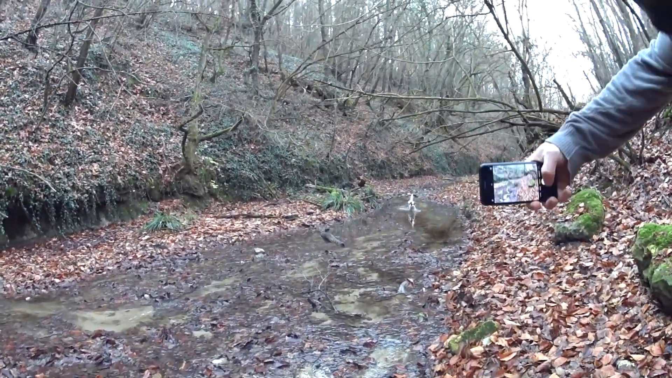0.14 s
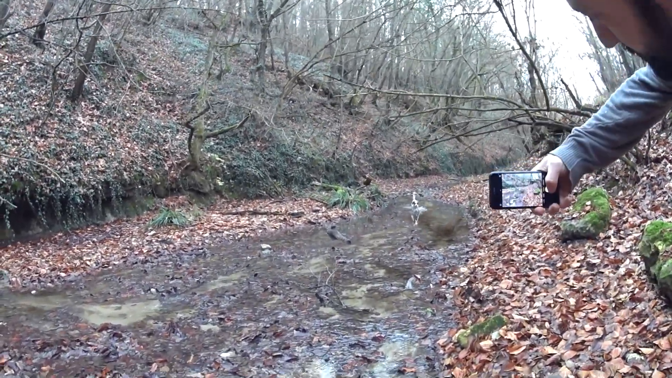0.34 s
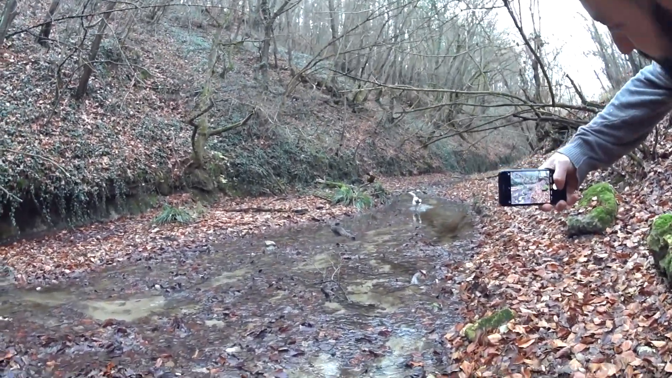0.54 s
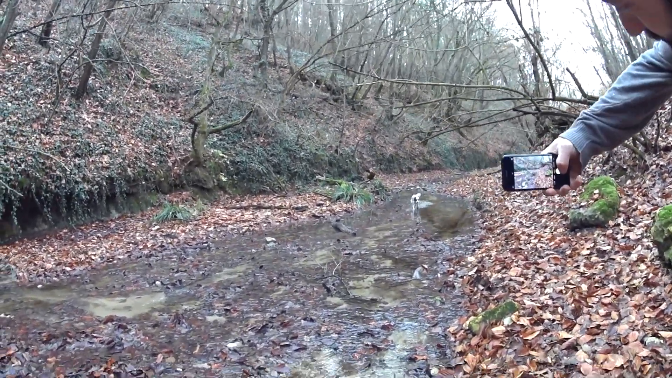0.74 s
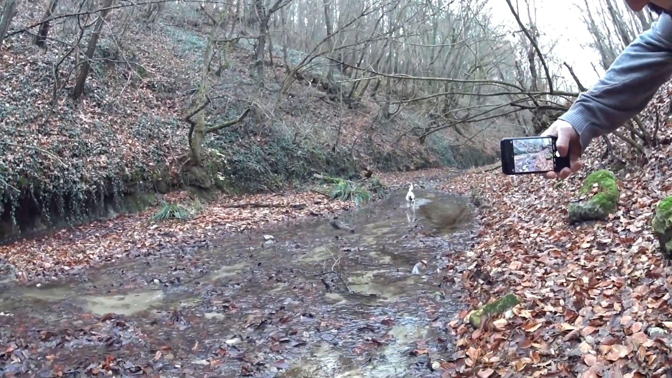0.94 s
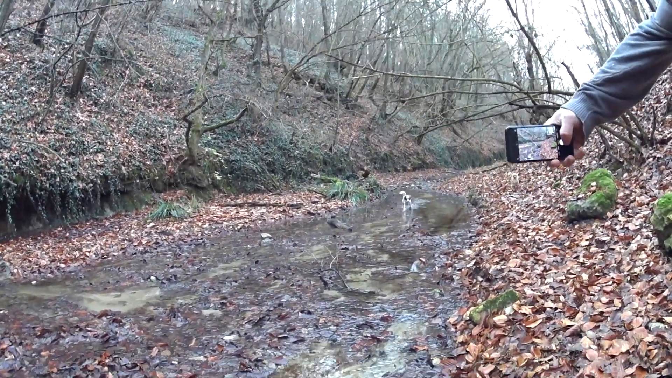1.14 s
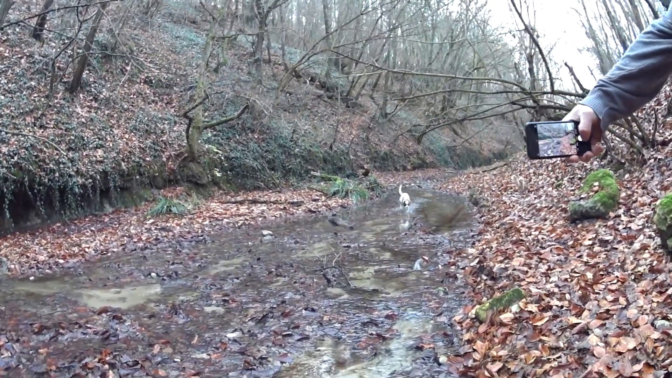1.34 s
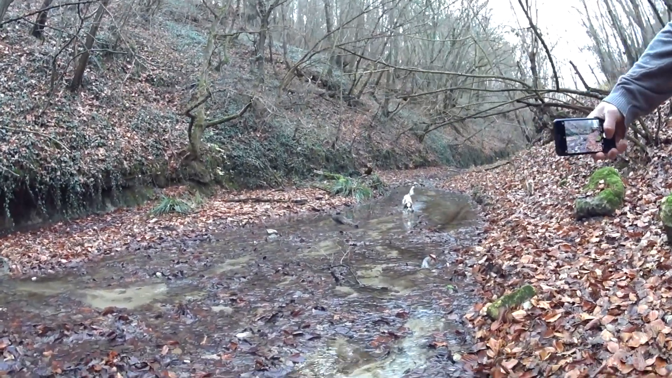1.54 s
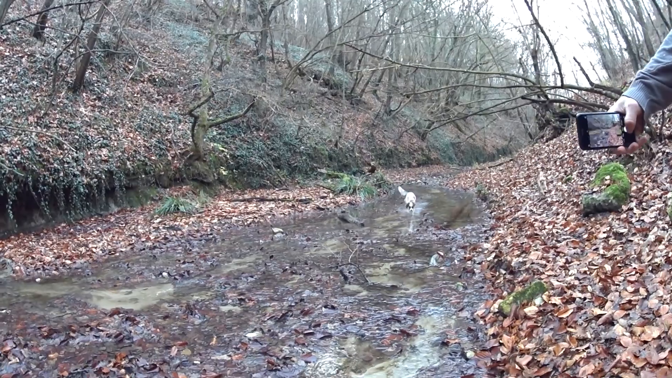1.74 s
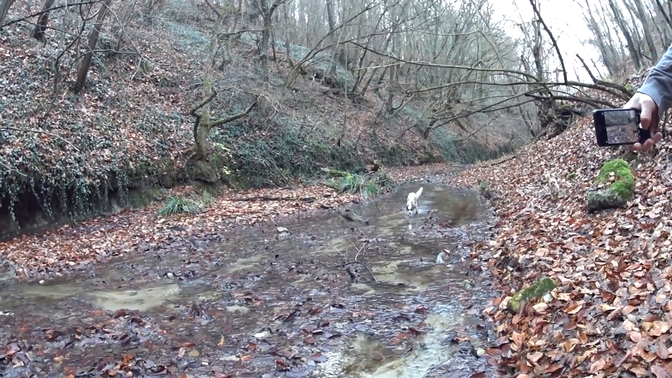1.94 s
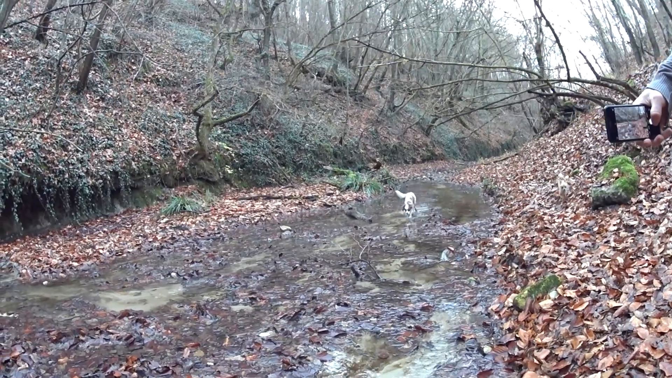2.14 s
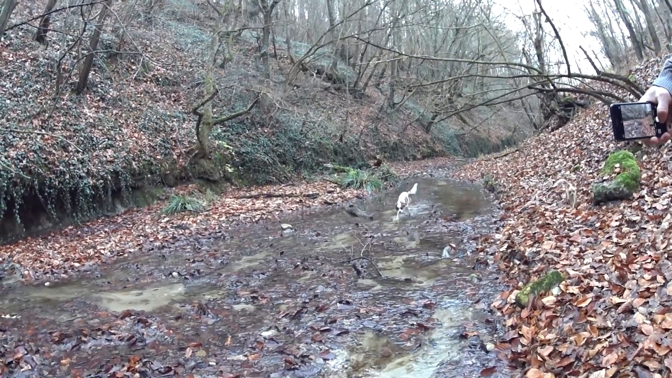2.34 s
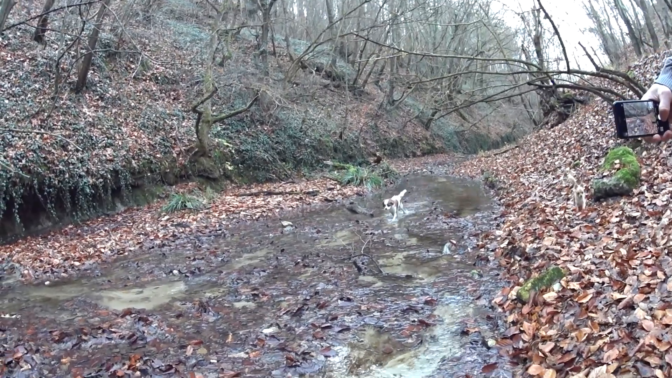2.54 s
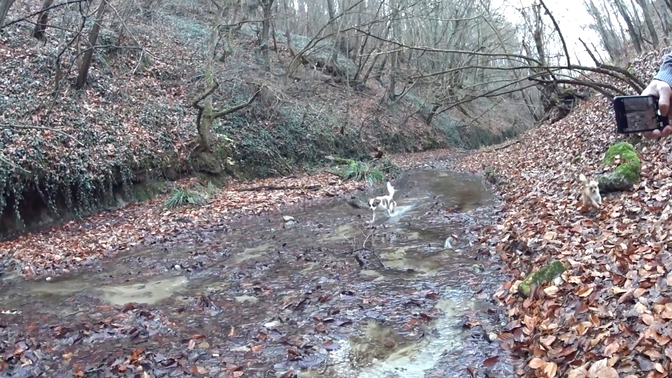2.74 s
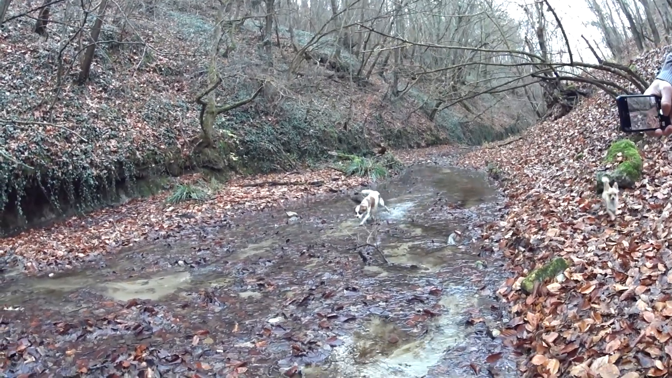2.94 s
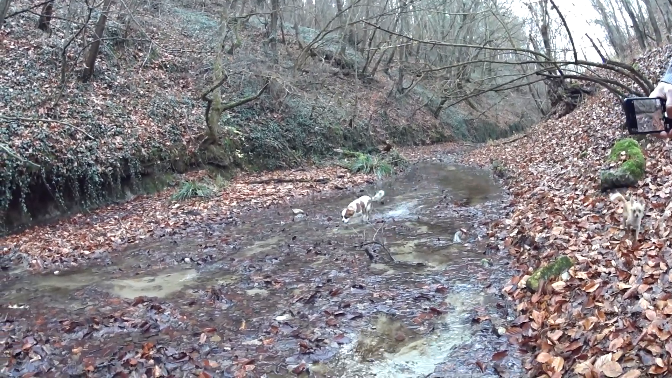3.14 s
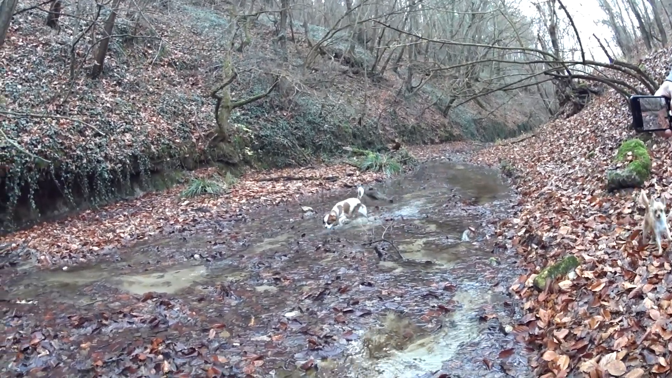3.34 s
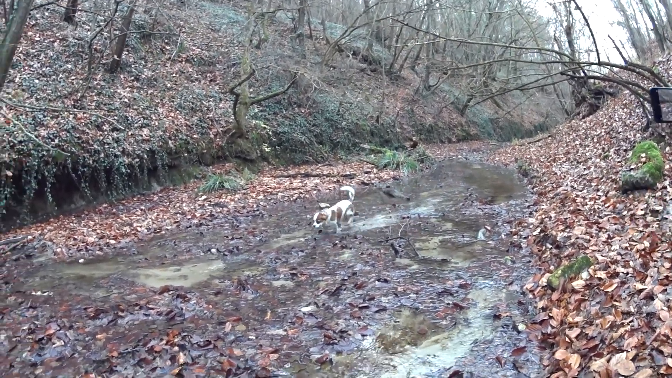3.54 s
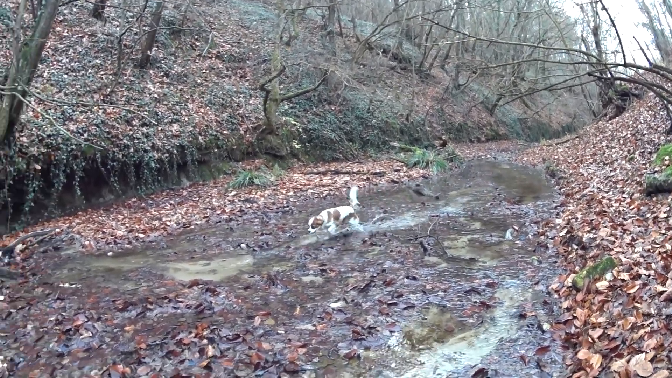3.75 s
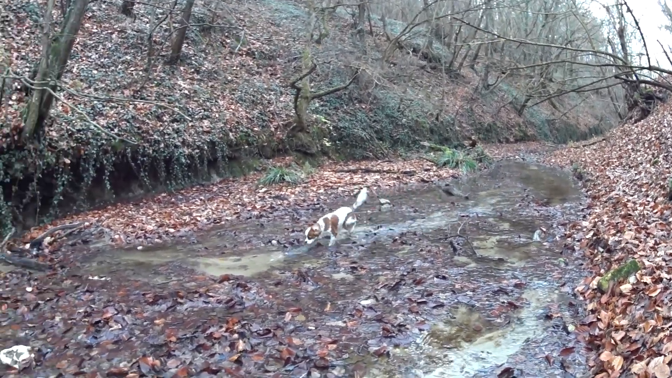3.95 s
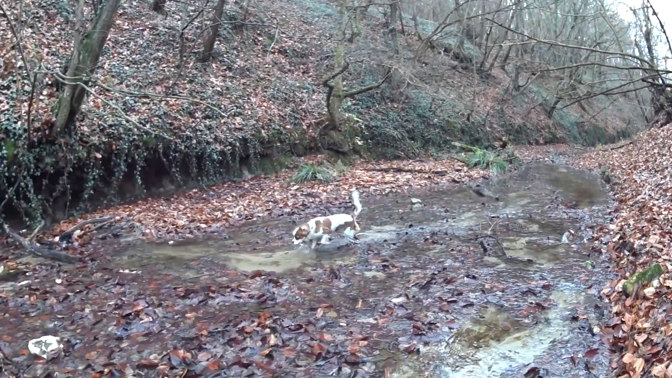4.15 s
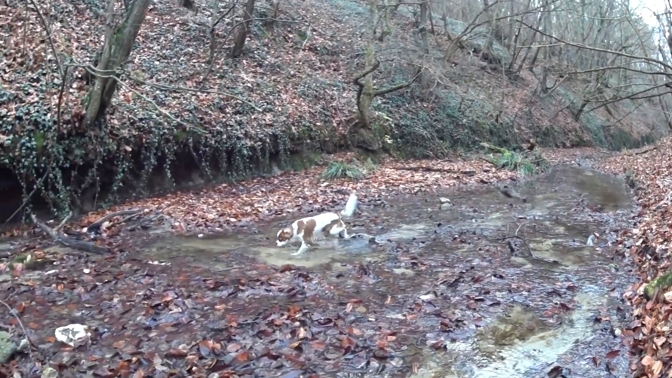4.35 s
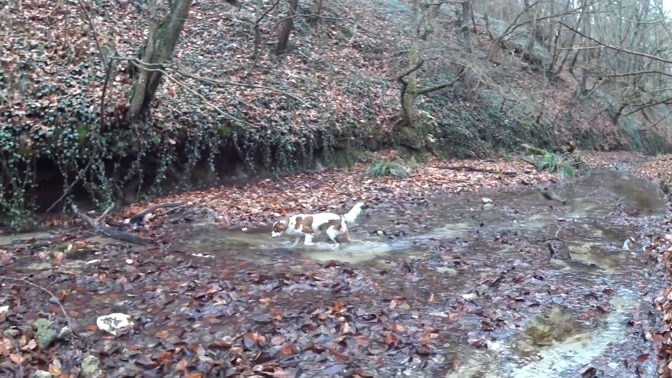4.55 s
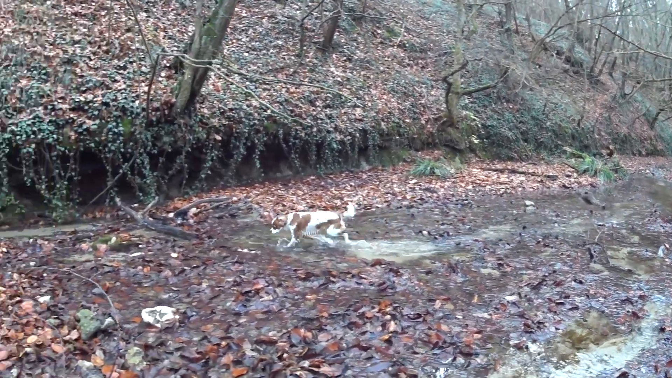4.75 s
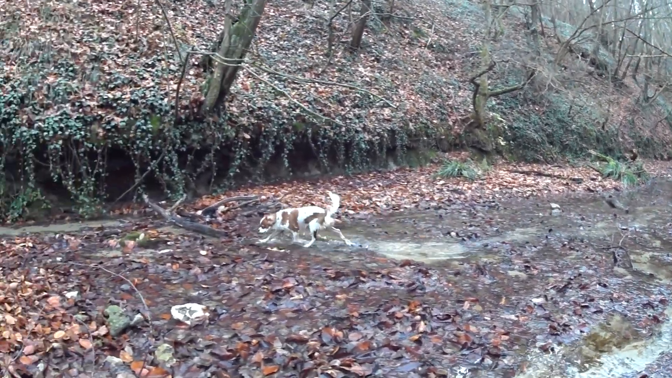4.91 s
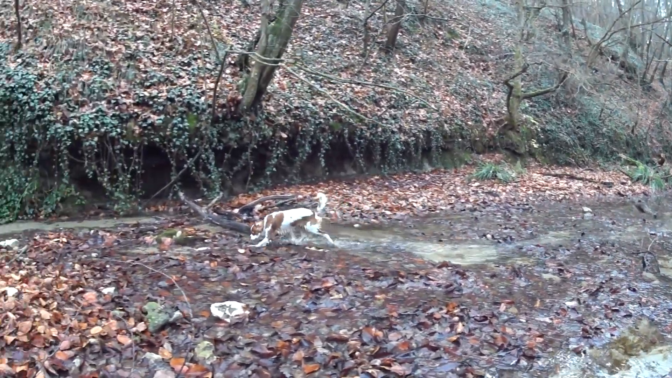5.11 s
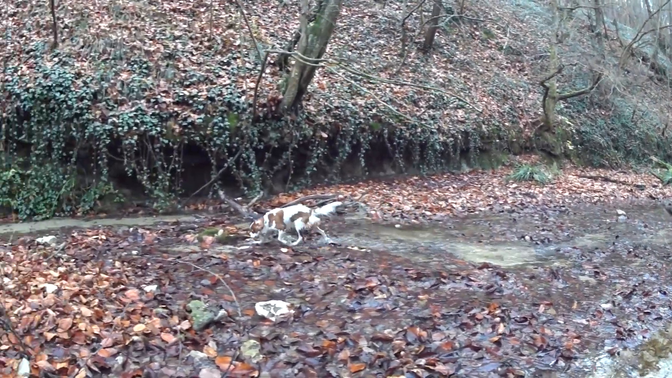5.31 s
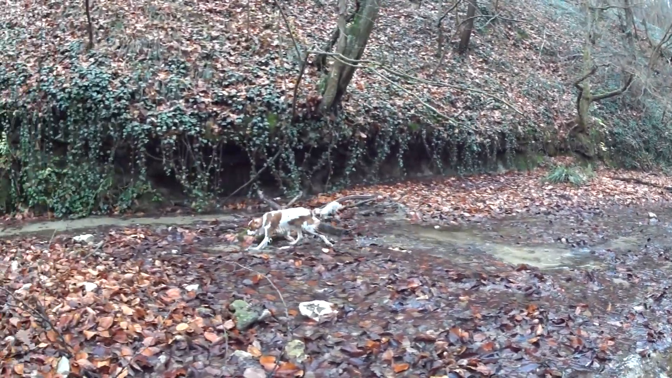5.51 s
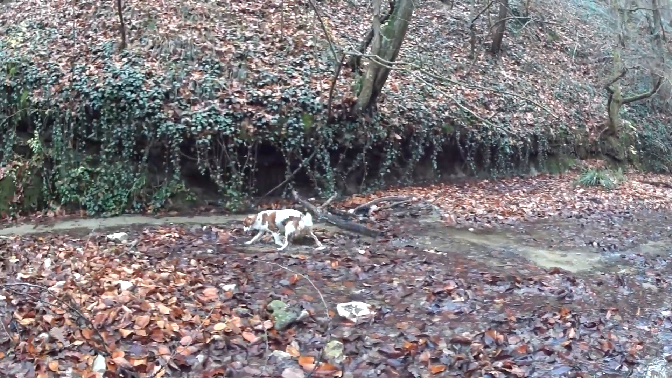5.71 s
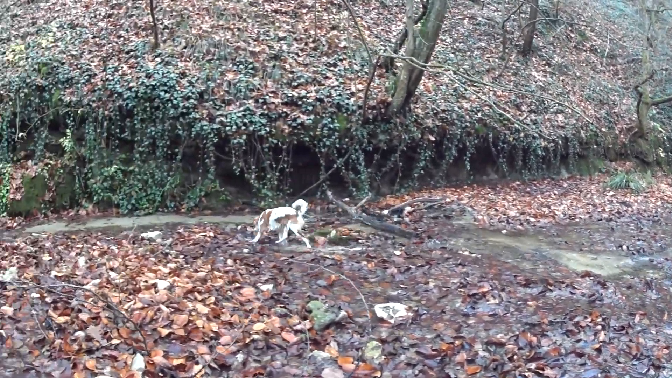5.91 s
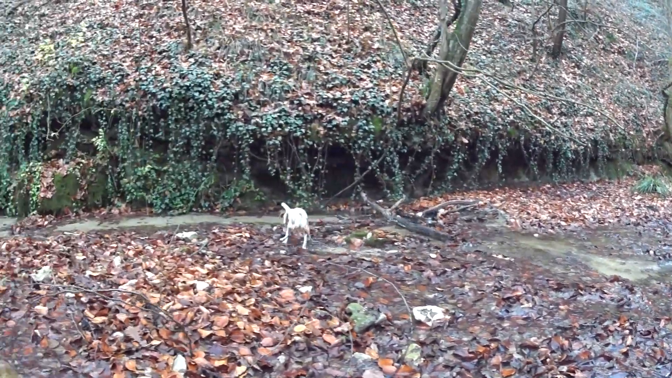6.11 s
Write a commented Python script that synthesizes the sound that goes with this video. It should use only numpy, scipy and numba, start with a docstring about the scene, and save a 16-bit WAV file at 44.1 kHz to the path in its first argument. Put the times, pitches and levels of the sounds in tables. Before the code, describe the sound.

A small dog trots through a shallow stream in a wooded gully. A brief rushing splash opens, followed by light, uneven paw slaps with plops and pattering drops. The splashing grows busier and louder towards the middle, with a short hollow slosh and a few sharp wet clicks, then eases slightly. The brook hisses faintly throughout, and a bird gives one barely audible note. The microphone is a few metres away.

```python
"""Small dog in a shallow stream

A wooded gully, a phone a few metres from a dog trotting upstream. Paws slap the water, the sharpest
with a click; trapped air plops and gurgles, and thrown drops patter back as spray. Drops and
bubbles ring as brief, rising sines. The brook hisses behind, a bird pipes once, the banks echo."""
import sys
import numpy as np
from scipy import signal
from scipy.fft import rfft, irfft, next_fast_len
from scipy.io import wavfile
from scipy.ndimage import uniform_filter1d
from numba import njit

SR = 44100
rng = np.random.default_rng(int(sys.argv[2]) if len(sys.argv) > 2 else 0)


def wav_record(signal):
    """Record a signal, one row per channel, as 16-bit PCM in the file named by sys.argv[1]."""
    frames = np.transpose(np.atleast_2d(signal))
    bounded = np.clip(frames, -1, 1)
    # unit amplitude maps onto the largest positive 16-bit level
    quanta = np.round(bounded * 32767).astype(np.int16)
    wavfile.write(sys.argv[1], SR, quanta)


N = 276639


def undb(db):
    """Decibels to gain."""
    return 10 ** (np.asarray(db) / 20)


def level(x, db):
    """Scale to an rms level."""
    return x * undb(db) / np.sqrt(np.mean(x ** 2))


def colour(x, table):
    """Shape a signal by (Hz, dB) points."""
    hz, db = np.transpose(table)
    size = next_fast_len(N, True)
    bins = np.linspace(1, SR / 2, size // 2 + 1)
    gain = undb(np.interp(np.log(bins), np.log(hz), db))
    return irfft(rfft(x, size) * gain, size)[..., :N]


def walk(rate):
    """Smooth random wander of spread 1, with `rate` new values a second."""
    hold = int(SR / rate)
    steps = np.repeat(rng.standard_normal(N // hold + 1), hold)
    slow = uniform_filter1d(uniform_filter1d(steps, hold), hold)[:N]
    return slow / np.std(slow)


@njit
def ring(start, hz, attack, t60, rise, size, side):
    """Sines that swell, decay and rise. Row 0 is pressure, row 1 its sideways part (left positive)."""
    out = np.zeros((2, N))
    for g in range(len(start)):
        phasor, shut = size[g] + 0j, 1.
        turn = np.exp(2j * np.pi * hz[g] / SR - np.log(1000.) / (t60[g] * SR))
        glide = np.exp(2j * np.pi * hz[g] * np.log(2.) * rise[g] / SR ** 2)
        swell = np.exp(-1 / (attack[g] * SR))
        first = int(start[g] * SR)
        for j in range(max(first, 0), min(first + int(t60[g] * SR), N)):
            pressure = phasor.imag * (1 - shut) ** 2
            out[0, j] += pressure
            out[1, j] += pressure * side[g]
            phasor *= turn
            turn *= glide
            shut *= swell
    return out


def drops(s, hz, cycles, size, side):
    """Small bubbles: each swells for about one cycle and dies by 60 dB over `cycles`."""
    s, hz, cycles, size, side = (np.ravel(c) for c in np.broadcast_arrays(s, hz, cycles, size, side))
    return ring(s, hz, 0.4 / hz, cycles / hz, 0.016 * hz, size, side)


def slaps(spray_gain, count=7):
    """A paw or big drop hits the water: a tight crowd of bubbles, a bright edge, then trailing drops."""
    # Each row: start in seconds, level in dB, centre pitch in Hz, length in ms, edge in relative dB.
    hits = [(0.0463, -27, 3630, 2.6, -28), (0.0794, -36, 3100, 3, -26), (0.1104, -33, 4260, 3.2, -30),
            (0.249, -37.5, 3880, 3, -27), (0.3312, -38, 4900, 4.3, -27), (0.3487, -32.5, 4570, 3.4, -27),
            (0.4683, -48, 3100, 3.7, -16), (0.5743, -41, 4460, 3.6, -23), (0.7142, -41, 3280, 4.6, -29),
            (0.8111, -41, 3580, 3.4, -11), (1.0202, -49, 2600, 2.1, -4), (1.1328, -36, 2230, 3.2, -20),
            (1.1927, -43, 4500, 3.6, -25), (1.3763, -38, 2950, 2.8, -18), (1.4018, -34, 4040, 1.7, -22),
            (1.4154, -35, 3900, 3.1, -30), (1.47, -33.5, 4570, 2.8, -29), (1.5941, -34, 2300, 4.9, -8),
            (1.8135, -42, 3000, 2.9, -4.5), (1.93, -42, 2200, 2.9, -35), (2.0026, -33.5, 7900, 1.9, -27),
            (2.2253, -38.5, 5040, 2.8, -16), (2.4256, -36, 6300, 2.5, -11), (2.437, -38, 8800, 3, -26),
            (2.4494, -34.5, 3970, 2.5, -21), (2.4953, -36, 3630, 3, -22), (2.5782, -37, 2740, 3.3, -16),
            (2.6, -32.5, 4500, 2, -26), (2.6172, -25, 6960, 3.8, -25), (2.6297, -27.5, 3880, 1.7, -32),
            (2.644, -37.5, 2580, 1.9, -30), (2.697, -42, 2190, 4.4, -35), (2.704, -37, 4800, 2, -28),
            (2.7184, -40, 3320, 4.4, -31), (2.7335, -38, 3260, 3.2, -30), (2.7746, -31.5, 2400, 3.8, -30),
            (2.784, -31, 2870, 2, -33), (2.8001, -25.5, 4320, 3.4, -13), (2.8252, -33.5, 2500, 3.3, -25),
            (2.9233, -29.5, 2440, 2.8, -29), (2.997, -40, 2600, 3, -33), (3.0368, -35, 4350, 2.9, -10),
            (3.1467, -38.5, 3150, 2.7, -29), (3.224, -36, 4200, 1.2, -29), (3.241, -30, 2280, 3.8, -36),
            (3.2878, -24, 4100, 2.1, -14), (3.3026, -35, 4260, 3.6, -24), (3.3765, -23, 2840, 1.93, -38),
            (3.5154, -44, 2820, 4.9, -5), (3.5593, -44, 2210, 3, -32), (3.581, -37, 3450, 3.4, -32),
            (3.6326, -34, 4930, 2.2, -36), (3.6745, -26.5, 2340, 4.5, -35), (3.6915, -28, 2350, 2.9, -37),
            (3.7148, -28, 4830, 3.5, -10), (3.7233, -30, 3840, 2.2, -18), (3.8142, -51, 2360, 3, -27),
            (3.9236, -24, 4050, 2.37, -18), (3.94, -31, 6600, 2.6, -40), (3.9588, -24.5, 3220, 2.5, -40),
            (4.0412, -35.5, 3140, 3.2, -37), (4.115, -29.5, 4040, 2.2, -31), (4.1515, -39, 2460, 2.5, -21),
            (4.1684, -32.5, 3800, 2.6, -9.5), (4.1979, -38, 4160, 3, -33), (4.2202, -33.5, 3620, 3.1, -32),
            (4.2577, -31.5, 2220, 3.5, -34), (4.336, -34, 6100, 2.6, -22), (4.366, -43, 5000, 3, -28),
            (4.374, -30.5, 7600, 2.9, -7.5), (4.3854, -31, 3500, 2.4, -30), (4.3959, -28, 2960, 2.9, -35),
            (4.4453, -35.5, 2830, 2.8, -35), (4.4745, -50, 2780, 2.6, -32), (4.505, -47, 2870, 3.7, -23),
            (4.53, -36.5, 4400, 4.7, -23), (4.54, -35, 7290, 6.9, -28), (4.5471, -35.5, 3150, 4.7, -24),
            (4.5617, -39, 3760, 3, -16), (4.5704, -27, 5130, 3.7, -31), (4.581, -19, 4240, 2.25, -38),
            (4.6324, -36, 5360, 3.7, -29), (4.679, -45, 3200, 1.97, -33), (4.7125, -40, 7040, 2.4, -24),
            (4.7411, -35.5, 2220, 2.3, -29), (4.7684, -29.5, 3770, 3.2, -33), (4.778, -27, 4500, 4, -35),
            (4.787, -22, 3900, 2.3, -33), (4.8104, -34, 3030, 3.1, -26), (4.8444, -33.5, 5630, 3.8, -31),
            (4.8702, -33.5, 2220, 2.8, -31), (4.9117, -33.5, 4040, 2.5, -30),
            (4.968, -32.5, 3820, 3.5, -28), (4.9808, -33, 2390, 2.6, -23), (5.0045, -32, 2180, 3.45, -22),
            (5.0617, -34, 2700, 2, -32), (5.1004, -33, 2330, 5.2, -35), (5.1757, -25.5, 8600, 2.3, -18),
            (5.188, -25.5, 3910, 4.4, -34), (5.2095, -24, 3960, 3.3, -34), (5.231, -31, 2980, 3.1, -36),
            (5.321, -35.5, 4560, 2.3, -20), (5.3535, -31, 2860, 1.5, -36), (5.3805, -42, 3020, 3.7, -16),
            (5.3967, -33.5, 2500, 2.6, -9), (5.4102, -24.5, 4480, 2.7, -18.5), (5.462, -35, 4370, 4.1, -20),
            (5.566, -39, 5500, 2.2, -35), (5.5783, -35.5, 7050, 3.7, -5.5), (5.5873, -36, 2720, 1.5, -35),
            (5.594, -48, 7800, 3, -30), (5.6192, -32.5, 3450, 3.3, -18), (5.6885, -46, 4000, 3, -30),
            (5.727, -53, 2300, 3, -35), (5.7407, -37.5, 3060, 3.8, -34), (5.792, -29, 4250, 3.9, -31),
            (5.7985, -36, 3100, 1.34, -24), (5.9002, -36.5, 5700, 3.9, -20), (5.9743, -38, 2750, 2.7, -24),
            (5.993, -34, 2580, 2.5, -18), (6.0487, -45.5, 2250, 3.5, -4.5), (6.114, -37, 2900, 3.3, -32),
            (6.2207, -43, 2840, 4.6, -26), (6.2417, -40, 3000, 3.2, -27)]
    s, db, hz, ms, edge_db = np.vstack([hits, strays(spray_gain)]).T[..., None]
    u = rng.random((len(s), 3, count))
    detune = rng.standard_normal((len(s), count))
    side = -.5 + 0.19 * rng.standard_normal(s.shape)
    follower = np.arange(count) > 0  # the first bubble sounds at once, on the centre pitch
    onset = s + follower * ms / 1000 * u[:, 0]
    pitch = np.clip(hz * 2 ** (0.575 * detune * follower), 1200, 11000)
    size = undb(db + np.where(follower, -5.5, 3))
    crowd = drops(onset, pitch, np.where(follower, 11., 16), size, side)
    edge = drops(onset + 0.0011 * u[:, 2], 7500 * 1.14 ** u[:, 1], 8.5, undb(db + edge_db + 13.5), side)
    delay, height = rng.random((2, len(s), 10))
    wait = 0.042 * delay
    trail_size = undb(db - 6.5 + 9.3 * height - 630 * wait)
    trail = drops(s + ms / 1000 + wait, 2200 * 4.06 ** height, 15.2, trail_size, side)
    return crowd + edge + trail


def strays(spray_gain, count=110, ms=1.5, edge_db=-36):
    """Rows for small slaps at random moments, their level following the spray they fall in."""
    when, weakness, height = rng.random((count, 3)).T
    db = 20 * np.log10(spray_gain[(when * N).astype(int)]) + 12 - 8 * weakness
    hz = 2300 * 2.58 ** height
    return np.transpose([when * N / SR, db, hz, np.full(count, ms), np.full(count, edge_db)])


def stirred(throw_s=0.0041, spray_fall_s=0.039, gurgle_fall_s=0.035):
    """Spray and gurgle gains: a slow base, plus a swell and a fall round every footfall."""
    # Stir between footfalls. Each row: time in seconds, spray level in dB, gurgle level in dB.
    stir = [(0.0, -59, -55), (0.33, -56.5, -60.5), (0.57, -59, -65.5), (1.17, -61, -61.5),
            (1.69, -62.5, -67.5), (2.44, -59, -68), (2.79, -55, -60.5), (3.07, -54.5, -59.5),
            (3.54, -52.5, -60), (3.77, -52.5, -51), (4.26, -55.5, -63), (4.63, -57.5, -63),
            (4.98, -56.5, -59.5), (5.2, -53.5, -58), (5.59, -62, -69.5), (5.85, -61, -73),
            (6.01, -57.5, -61.5), (6.27, -56, -66)]
    # Footfalls that throw water. Each row: time in seconds, spray level in dB, gurgle in relative dB.
    steps = [(0.057, -21.5, -7), (0.249, -38, -3), (0.3496, -36, -20), (0.471, -34, -10.5),
             (0.573, -32, -15), (0.705, -35, -2.5), (0.8111, -46, -18), (1.02, -38, -30), (1.1323, -39, -6),
             (1.196, -30.5, -13.5), (1.402, -27.5, -21), (1.597, -27, -14), (1.815, -30.5, -16),
             (2.005, -36, -7), (2.2253, -44, -16), (2.4264, -44, -2), (2.6123, -22.5, -11.5),
             (2.797, -28, -1), (2.922, -35.5, 3), (3.0355, -40, -24), (3.1467, -56, -2), (3.242, -27, -28),
             (3.2875, -32, -4), (3.3772, -42, -20), (3.5154, -31, -10), (3.6326, -35, -5),
             (3.6915, -32.5, -1), (3.7676, -43, 13.5), (3.8127, -46, -5), (3.924, -22, -28),
             (4.116, -23, -11.5), (4.256, -28, -18), (4.379, -26.5, -33), (4.576, -24.5, -36),
             (4.781, -21.5, -16), (5, -27, -24), (5.1008, -54, -1), (5.178, -27.5, -20), (5.232, -33.5, -5),
             (5.391, -25, -16.5), (5.5787, -35, -19), (5.619, -33.5, -6.5), (5.797, -35.5, -1),
             (5.977, -28, -12), (6.1135, -42, -7), (6.225, -27.5, -8)]
    t = np.arange(N) / SR
    s, *base_db = np.transpose(stir)
    spray_power, gurgle_power = (undb(np.interp(t, s, db)) ** 2 for db in base_db)
    for at, db, gurgle_db in steps:
        i = slice(max(int((at - .1) * SR), 0), int((at + .3) * SR))
        swell = np.minimum(t[i] - at, 0) / throw_s
        after = np.maximum(t[i] - at, 0)
        spray_power[i] += (undb(db - 20) * np.exp(swell - after / spray_fall_s)) ** 2
        gurgle_power[i] += (undb(db + gurgle_db - 14.5) * np.exp(swell - after / gurgle_fall_s)) ** 2
    return np.sqrt(spray_power), np.sqrt(gurgle_power)


def patter(count, mid_hz, octaves, cycles, tilt_db, scatter_db, lean, spread):
    """Drops at random moments, spread round a middle pitch; a few are far louder than the rest."""
    when, chance = rng.random((count, 2)).T
    detune, across = rng.standard_normal((count, 2)).T
    hz = np.clip(mid_hz * 2 ** (octaves * detune), 300, 17000)
    luck = -np.log(1 - .99 * chance)
    size = undb(scatter_db * luck + tilt_db * octaves * detune)
    shower = drops(when * N / SR, hz, cycles, size, lean + spread * across)
    return shower / np.sqrt(np.mean(shower[0] ** 2))


def churn(spray_gain, gurgle_gain):
    """Spray, its fine mist, the wash of fused drops and the gurgle follow how hard the water is stirred."""
    spray = patter(16000, 4165, octaves=.654, cycles=24., tilt_db=.5, scatter_db=2.7, lean=-.79, spread=.77)
    mist = patter(9000, 10000, octaves=.3, cycles=14., tilt_db=-3, scatter_db=2, lean=0, spread=.9)
    wash = patter(40000, 3440, octaves=.936, cycles=7.8, tilt_db=2, scatter_db=2.1, lean=-.89, spread=.97)
    gurgle = patter(4500, 1400, octaves=.5, cycles=13.8, tilt_db=3, scatter_db=2, lean=-.52, spread=.8)
    patchy = undb(2.2 * (walk(45) - .3))
    thrown = undb(-1.5) * spray + undb(-18) * mist + undb(-7) * wash
    return spray_gain * patchy * thrown + gurgle_gain * gurgle


def plops(rise_octaves_per_s=2.1):
    """A closing air pocket rings at its own pitch and rises; smaller pockets beside it roughen it."""
    # Each row: start in seconds, level in dB, pitch in Hz, length in ms.
    pockets = [(0.014, -33.5, 1250, 8.9), (0.037, -33, 1580, 5.7), (0.056, -30, 1880, 4.5),
               (0.068, -31, 1670, 5.4), (0.119, -38, 1020, 5.4), (0.164, -38, 1570, 3.8),
               (0.238, -41, 960, 5.8), (0.251, -41, 1500, 6), (0.35, -39, 1330, 5), (0.37, -41, 1810, 5.9),
               (0.575, -43, 1400, 7.3), (0.825, -34, 1610, 4.8), (1.028, -31.5, 1370, 6.2),
               (1.076, -42, 1740, 8), (1.133, -34.5, 1150, 5.2), (1.145, -40, 1240, 7),
               (1.241, -45, 915, 5.3), (1.416, -43, 1580, 5.9), (1.58, -38, 1660, 5.1),
               (1.595, -36.5, 960, 8.5), (1.613, -37.5, 1390, 6.2), (2.008, -39, 1150, 3.6),
               (2.011, -34.5, 790, 3.82), (2.23, -37.5, 1025, 5.6), (2.427, -37, 995, 5.3),
               (2.581, -41, 1180, 5.2), (2.619, -33, 1010, 5.7), (2.639, -41.5, 1040, 7.3),
               (2.79, -33, 900, 5.9), (2.802, -34, 920, 5.2), (2.819, -32.5, 1610, 5.3),
               (2.865, -39, 925, 6.3), (2.907, -34, 950, 5.4), (2.921, -35, 2010, 4.9),
               (2.947, -34, 1610, 5), (3.122, -39, 925, 5.2), (3.145, -35, 930, 7.5), (3.15, -49, 1650, 11),
               (3.163, -46, 935, 14), (3.242, -34.5, 1390, 4.7), (3.529, -38, 1720, 9.2),
               (3.617, -32.5, 1053, 7.1), (3.673, -34.5, 2140, 7.6), (3.773, -38, 1530, 9.1),
               (3.782, -33, 807, 5.6), (3.805, -28.5, 1070, 4.2), (3.813, -26, 1550, 6.7),
               (3.815, -38, 1180, 5.4), (3.927, -30, 1035, 5.2), (3.958, -38.5, 1990, 6.8),
               (4.115, -35, 1150, 5.7), (4.263, -47, 1240, 14), (4.376, -39, 1180, 6.7),
               (4.396, -32, 1890, 4.8), (4.42, -32.5, 1500, 3.8), (4.428, -42.5, 1130, 9),
               (4.556, -41, 2080, 4), (4.716, -41.5, 1540, 4.8), (4.742, -40.5, 1020, 5),
               (4.787, -37, 1090, 5.6), (4.815, -42, 1290, 7.6), (5.035, -33, 1850, 5),
               (5.098, -34.5, 1480, 5.6), (5.1, -44, 700, 7.9), (5.111, -36, 1310, 7.3),
               (5.178, -34, 1170, 5.9), (5.188, -40, 1080, 5), (5.232, -36, 1410, 3.3),
               (5.239, -31, 1645, 6), (5.395, -51, 1940, 7.9), (5.41, -38.5, 1600, 7.3),
               (5.619, -36.5, 853, 6), (5.63, -47, 842, 8.2), (5.797, -36.5, 1070, 6.8),
               (5.806, -49, 1130, 6.7), (5.993, -55, 1650, 7.7), (6.223, -45, 900, 6.5),
               (6.237, -39, 960, 8.1)]
    s, db, hz, ms = np.transpose(pockets)
    side = -.6 + 0.12 * rng.standard_normal(len(s))
    rise = np.full(len(s), rise_octaves_per_s)
    main = ring(s - .0008, hz, 0.00022 * ms, 0.0027 * ms, rise, undb(db + 7.5), side)
    delay, height = rng.random((2, len(s), 6))
    s, db, hz, ms, side = (c[:, None] for c in (s, db, hz, ms, side))
    beside_hz = hz * 2 ** (1.64 * height - .3)
    beside = drops(s + 1.291 * ms / 1000 * delay, beside_hz, 10.2, undb(db - 10.5), side)
    twins = drops(s + .0004 * ms * delay[:, :2], hz * np.array([.84, 1.28]), 6., undb(db - 3), side)
    return main + beside + twins


def cracks(ring_ms=1.38, side=-.4):
    """A paw breaks the surface: a sharp click in six bands, with one weaker rebound."""
    # Each row: time in seconds, treble level in dB, then middle and top in dB relative to it.
    clicks = [(0.3507, -49, 6, -12), (0.4732, -39, -4, -15), (0.5757, -42, 6, -18), (0.5797, -41, -6, -20),
              (0.813, -38.5, -3, -23), (0.8395, -45, -10, -30), (1.0203, -39, 3, -13),
              (1.0259, -41, -5, -15), (1.1348, -41, 7, -12), (1.1384, -45, 3, -17), (1.343, -47, -2, -1),
              (1.3783, -50, 9, -3), (1.401, -36.5, -4, -17), (1.4168, -43, 4, -21), (1.5923, -37, -5, -30),
              (1.596, -28, 3, -22), (1.6051, -44, 1, -22), (1.8136, -45, -1, -4), (1.9418, -48, 0, -22),
              (2.0049, -51, -10, -17), (2.0221, -45, -9, -20), (2.2304, -43, 0, -12), (2.235, -41, 2, -27),
              (2.4278, -40, -8, -10), (2.4378, -45, -6, -22), (2.4704, -47, -3, -12), (2.5817, -41, -5, -4),
              (2.6205, -31, -3, -12), (2.6322, -37, -2, -22), (2.787, -39, -6, -25), (2.801, -29.5, 3, -24),
              (2.8232, -45, -2, -7), (3.0371, -43, -1, -15), (3.0407, -42, 3, -8), (3.2144, -47, 2, -28),
              (3.2414, -44, 9, -21), (3.248, -36, 3, -17), (3.2906, -25.5, -15, -13), (3.304, -43, 3, -18),
              (3.3793, -32.5, 3, -21), (3.4427, -44, 3, -19), (3.469, -42, 1, -5), (3.518, -39, 0, -14),
              (3.6892, -50, -6, -27), (3.7155, -36, -2, -18), (3.7244, -39, 5, -18), (3.908, -40, -7, -20),
              (3.9253, -32, 7, -25), (3.9334, -46, -1, -21), (3.9407, -40, -1, -24), (4.1102, -45, 4, -31),
              (4.1693, -38, -6, -12), (4.2269, -48, 2, -23), (4.318, -40, -2, -9), (4.3404, -45, 3, -25),
              (4.3776, -31, -8, -23), (4.3872, -35, 0, -26), (4.5059, -44, 2, -24), (4.5379, -45, -8, -22),
              (4.5426, -47, -5, -25), (4.5517, -40, 4, -10), (4.5741, -32, -3, -21), (4.5844, -39, 6, -22),
              (4.5873, -35, 6, -16), (4.634, -45, -2, -23), (4.7126, -43, -15, -27), (4.7227, -37, -6, -25),
              (4.779, -34, 3, -23), (4.79, -29.5, 4, -20), (4.812, -40, -6, -28), (4.8865, -49, 6, -24),
              (4.9178, -43, -5, -19), (4.986, -36, 2, -27), (4.9978, -42, -7, -18), (5.0058, -30, 4, -18),
              (5.0183, -43, -6, -15), (5.1265, -46, -5, -21), (5.1436, -41, 3, -27), (5.1768, -35, -6, -8),
              (5.218, -46, -3, -23), (5.312, -44, -9, -26), (5.3244, -47, 1, -21), (5.397, -41, 5, -6),
              (5.412, -40, 7, -26), (5.5813, -30, -3, -5), (5.6199, -40, 1, -22), (5.6458, -46, -6, 2),
              (5.7925, -52, 7, -32), (5.8, -31.5, -1, -9), (5.948, -41, 3, -21), (5.9655, -40, -10, -12),
              (5.983, -36, -8, -22), (6.0555, -47, 0, -3), (6.1853, -44, 3, -21), (6.253, -42, 3, -18)]
    band_hz = np.array([2800, 4600, 7000, 9300, 12500, 14800])
    band_db = np.array([-10, 6.5, 6.5, -3, 1.5, 3])
    s, db, mid_db, top_db = np.transpose(clicks)[..., None]
    u = rng.random((len(s), 3, len(band_hz)))
    hz = band_hz * (.93 + .14 * u[:, 0])
    tilt_db = band_db + (band_hz < 6000) * np.minimum(mid_db, 3) + (band_hz > 11000) * top_db
    size = undb(db + tilt_db + 4)
    cycles = hz * ring_ms / 1000
    click = drops(s - .0003 + .0003 * u[:, 1], hz, cycles, size, side)
    rebound = drops(s + .0003 + .0015 * u[:, 2], hz, cycles, size * undb(-11), side)
    return click + rebound


def sharp_clicks(cycles=2.5, side=-.3):
    """Twigs snap: a very short, broad click with a faint rebound."""
    # Each row: start in seconds, level in dB.
    snaps = [(5.005, -32), (5.41, -28), (5.581, -34), (5.7987, -19.5)]
    s, db = np.transpose(snaps)[..., None]
    hz = np.array([3500, 7000, 13000])
    size = -undb(db + np.array([9, 8, 5]))
    return drops(s, hz, cycles, size, side) + drops(s + .0009, hz, cycles, size * undb(-8), side)


def surge():
    """A heavy splash dies away at the start: so many drops at once that they fuse into a rush."""
    # Each row: time in seconds, level in dB.
    envelope = [(0.0, -42.5), (0.028, -40), (0.06, -41), (0.13, -41), (0.16, -54), (0.2, -53)]
    # Each row: frequency in Hz, relative noise density in dB.
    spectrum = [(88, -63), (150, -10), (430, -9), (564, -2.5), (1140, -2.5), (1850, -4.5), (2080, -2),
                (10100, -16.5), (15800, -28)]
    s, db = np.transpose(envelope)
    t = np.arange(N) / SR
    pressure, sideways = level(colour(rng.standard_normal((2, N)), spectrum), -1)
    gain = undb(np.interp(t, s, db) + 1.25 * walk(139))
    fade = np.clip((s[-1] - t) / 0.12, 0, 1)
    return gain * fade * np.array([pressure, 0.44 * sideways - 0.6 * pressure])


def tone(table, side):
    """A sine along (seconds, Hz, dB) points, faded at both ends."""
    s, hz, db = np.transpose(table)
    t = np.arange(N) / SR
    fade = np.clip(np.minimum(t - s[0], s[-1] - t) / 0.0013, 0, 1)
    wave = np.sin(2 * np.pi * np.cumsum(np.interp(t, s, hz)) / SR)
    return np.sqrt(2) * fade * undb(np.interp(t, s, db)) * wave * np.array([[1], [side]])


def glug():
    """One deep cavity fills slowly, so its rough tone climbs."""
    # Each row: time in seconds, pitch in Hz, level in dB.
    cavity = [(3.149, 721, -59), (3.153, 718, -38), (3.16, 700, -41), (3.165, 672, -51), (3.18, 760, -54),
              (3.191, 946, -45), (3.205, 1100, -57), (3.215, 1500, -55)]
    return undb(2 * walk(180)) * tone(cavity, side=-0.41)


def slosh(count=45):
    """Water slops in a hollow round the legs: large bubbles near its pitch blur into a hoarse tone."""
    # Each row: time in seconds, pitch of the hollow in Hz, level in dB.
    hollow = [(3.601, 650, -50), (3.64, 620, -47.5), (3.69, 490, -47), (3.72, 470, -55),
              (3.745, 520, -49.5), (3.79, 475, -60), (3.825, 472, -44), (3.86, 493, -58), (3.9, 500, -58),
              (3.96, 544, -56), (4.019, 553, -68)]
    s, hz, db = np.transpose(hollow)
    jitter, detune = rng.random((count, 2)).T
    when = s[0] + (s[-1] - s[0]) * (np.arange(count) + jitter) / count
    pitch = np.interp(when, s, hz) * (.95 + .04 * detune)
    return drops(when, pitch, cycles=25., size=undb(np.interp(when, s, db) + .7), side=-0.63)


def thud(at_s=3.688, hz=185, length_s=.026):
    """A paw meets the stream bed: a dull knock of a few cycles."""
    onsets = at_s + length_s * np.array([0, .3, .6])
    return drops(onsets, hz * np.array([1, 1.6, 2.3]), cycles=6.2, size=undb(-49), side=-.3)


def bird():
    """One faint, falling note off to the right, wavering in level."""
    # Each row: time in seconds, pitch in Hz, level in dB.
    note = [(2.105, 2100, -71), (2.115, 1980, -59), (2.143, 1894, -58), (2.175, 1880, -57),
            (2.19, 1850, -80)]
    return undb(walk(60)) * tone(note, side=-1.6)


def banks(x, t60_s=.06, echo_db=-14):
    """The leafy banks scatter a short, dense echo, different in pressure and sideways rows."""
    t = np.arange(int(.15 * SR)) / SR
    tail = rng.standard_normal((2, len(t))) * undb(-60 * t / t60_s) * np.clip(t / 0.0026, 0, 1)
    tail = signal.sosfilt(signal.butter(1, [900, 5000], "band", fs=SR, output="sos"), tail)
    tail = tail / np.sqrt(np.sum(tail[0] ** 2))
    return undb(echo_db) * signal.fftconvolve(x[:1], tail, axes=1)[:, :N]


def brook():
    """Far water and air in the trees: smooth hiss from all round that swells a little."""
    # Each row: frequency in Hz, relative noise density in dB.
    spectrum = [(25, -45), (40, -27), (63, -16.5), (160, -12), (250, -4.5), (400, -0.5), (1000, -3),
                (2000, -7), (4000, -7), (6300, -8.5), (8000, -8.5), (10000, -15), (12000, -18),
                (14000, -20), (16000, -21.5)]
    pressure, sideways = level(colour(rng.standard_normal((2, N)), spectrum), -61.5)
    swell = undb(.5 * walk(3))
    return swell * np.array([pressure, 2.22 * sideways - 0.28 * pressure])


def scene():
    """Dog, bird, banks and brook, picked up as left and right at the phone's two microphone ports."""
    # The dog crosses towards the left. Each row: time in seconds, added sideways share.
    drift = [(0, 0.019), (4.0, 0), (4.7, 0.15), (5.7, 0.33), (6.2, 0)]
    # How strongly the two ports differ. Each row: frequency in Hz, sideways gain in dB.
    ports = [(60, -28), (125, -17), (250, -13), (500, -9.5), (1000, -8.5), (2000, -10), (4000, -14),
             (8000, -18), (15000, -21.5)]
    spray_gain, gurgle_gain = stirred()
    water = churn(spray_gain, gurgle_gain) + slaps(spray_gain) + plops()
    water = water + cracks() + sharp_clicks() + surge() + glug()
    # small bubbles radiate almost no bass
    water = signal.sosfilt(signal.butter(3, 380, "high", fs=SR, output="sos"), water)
    direct = water + slosh() + thud() + bird()
    direct[1] += np.interp(np.arange(N) / SR, *np.transpose(drift)) * direct[0]
    pressure, sideways = direct + banks(direct) + brook()
    side = colour(sideways, ports)
    return np.array([pressure + side, pressure - side])


def record(dry):
    """The phone drops the deep bass and cuts the top."""
    dry = signal.sosfilt(signal.butter(2, 30, "high", fs=SR, output="sos"), dry)
    return signal.sosfilt(signal.ellip(10, .2, 70, 15650, fs=SR, output="sos"), dry)


dry = scene()
out = record(dry)
wav_record(out)
```